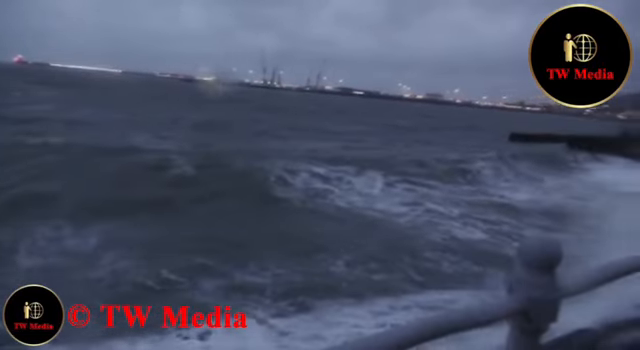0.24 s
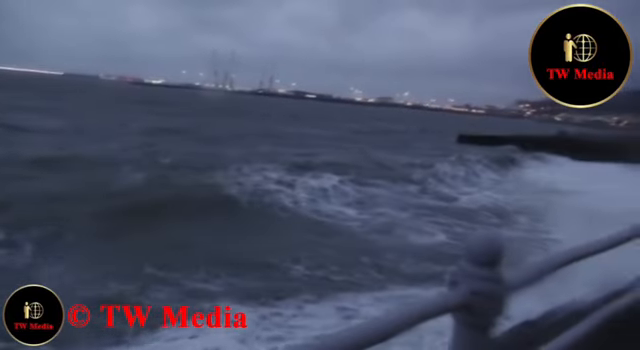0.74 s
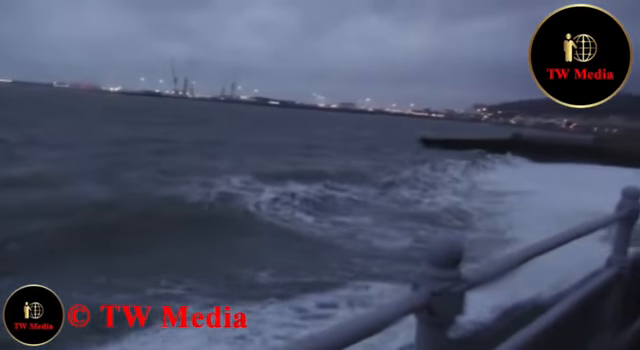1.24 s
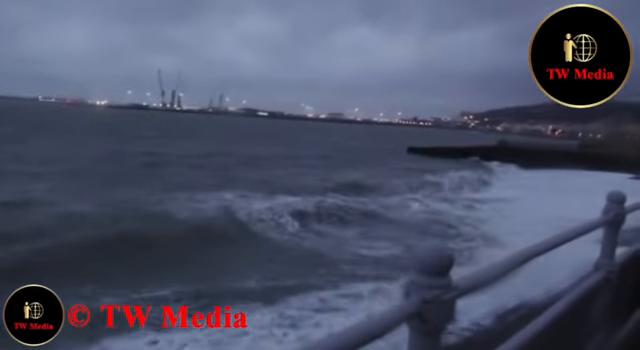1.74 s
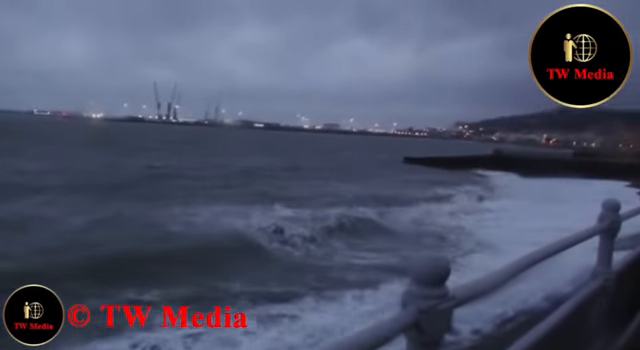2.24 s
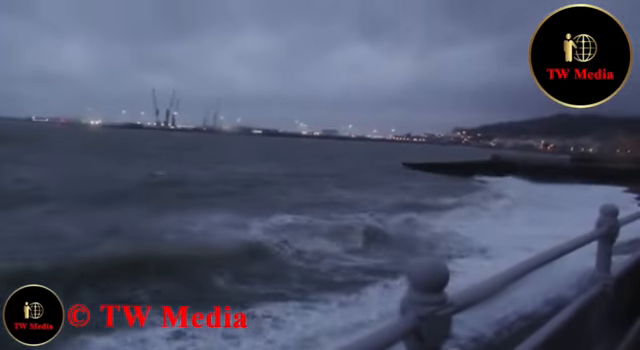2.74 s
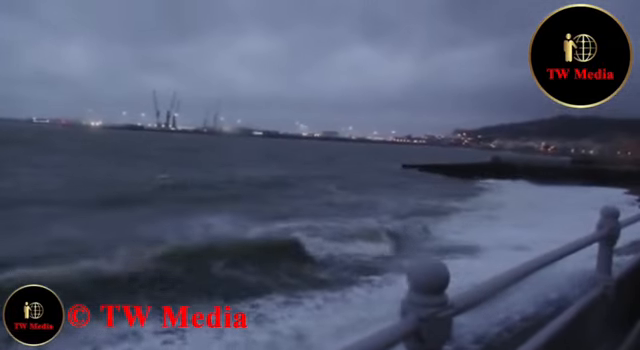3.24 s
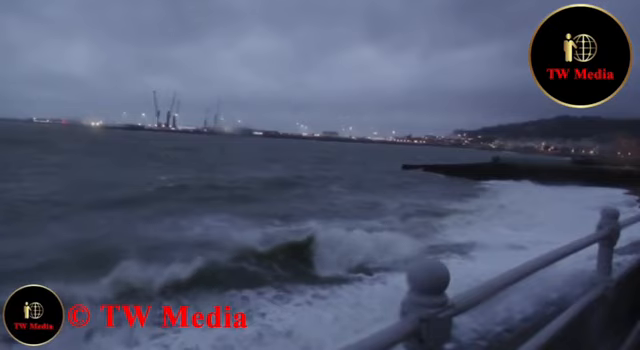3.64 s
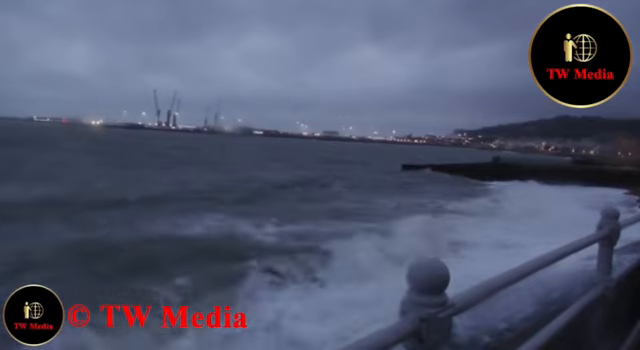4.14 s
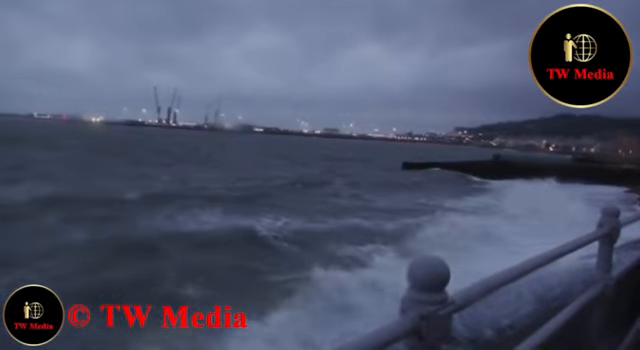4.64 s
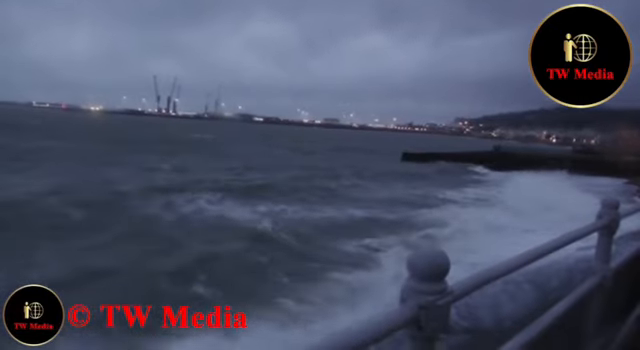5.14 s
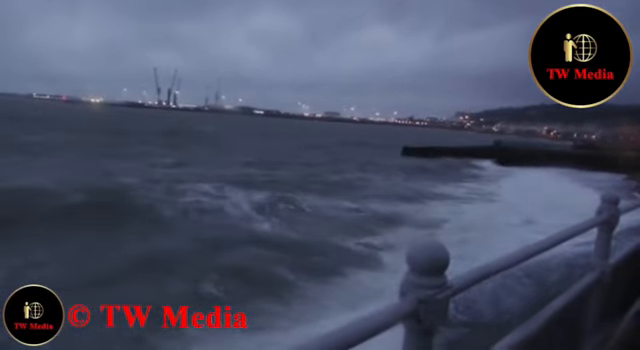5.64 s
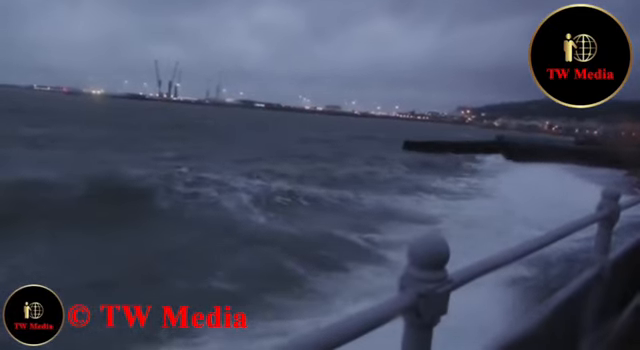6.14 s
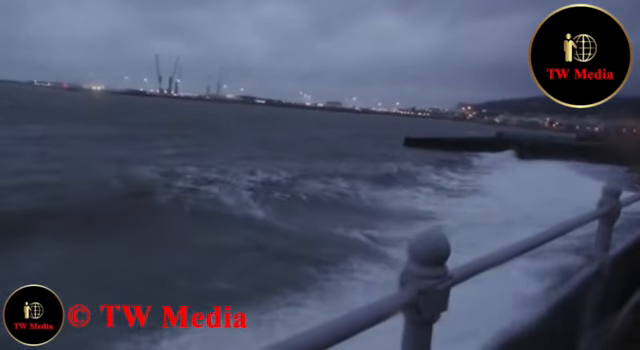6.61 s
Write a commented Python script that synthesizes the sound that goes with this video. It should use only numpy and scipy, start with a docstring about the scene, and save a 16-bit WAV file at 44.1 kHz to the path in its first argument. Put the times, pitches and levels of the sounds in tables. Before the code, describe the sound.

On an exposed seafront in a storm, low wind rumble dominates in stereo, heaving and tearing at the microphone. Rough water washes quietly at first, gradually swelling. Past the middle, a near wave plunges and its foam rushes up the wall, splashing and hissing for under two seconds. The surf then fades while gusty buffeting continues, peaks slightly squashed.

```python
"""A steady low roar: strong wind buffets both ports of a hand-held camera.
A storm sea washes along a harbour seawall; one wave topples close by and its foam sweeps up the wall.
Wind is shaped noise in four eddy sizes; water is patchy noise plus bursting bubbles under surging levels.
The camera's limiter holds the buffets down, so the surf flutters with them."""
import sys
import numpy as np
from scipy import signal
from scipy.fft import rfft, irfft, next_fast_len
from scipy.io import wavfile
from scipy.ndimage import uniform_filter1d, minimum_filter1d, map_coordinates

SR = 44100
rng = np.random.default_rng(int(sys.argv[2]) if len(sys.argv) > 2 else 0)


def master(y):
    """Save y as 16-bit WAV."""
    cut = np.clip(np.atleast_2d(y).T, -1, 1)
    pcm = np.round(cut * 32767)  # scale
    wavfile.write(sys.argv[1], SR, pcm.astype(np.int16))


N = 303011
TOP_HZ = 11700  # band limit


def amp(db):
    """Decibels to gain."""
    return 10 ** (np.asarray(db) / 20)


def unit(x):
    """Scale to rms 1, over all channels together."""
    return x / np.sqrt(np.mean(x ** 2) + 1e-20)


def along(points, hz):
    """Read (Hz, value) points on a log frequency axis."""
    point_hz, value = np.transpose(points)
    return np.interp(np.log(hz + 1), np.log(point_hz + 1), value)


def curves(rows):
    """One value per sample for each column after the time in seconds."""
    s, *columns = np.transpose(rows)
    return [np.interp(np.arange(N) / SR, s, column) for column in columns]


def wobble(knots_per_s):
    """A smooth curve through random knots."""
    knots = rng.standard_normal(int(N * knots_per_s / SR) + 4)
    return map_coordinates(knots, [np.arange(N) * knots_per_s / SR])


def filtered(x, response):
    """Multiply the spectrum of x by a response of frequency."""
    m = next_fast_len(N + SR // 2)
    return irfft(rfft(x, m) * response(np.fft.rfftfreq(m, 1 / SR)), m)[..., :N]


def split(x, edge_hz):
    """The parts below and above an edge, each at rms 1."""
    low = filtered(x, lambda hz: 1 / (1 + (hz / edge_hz) ** 8))
    return unit(low), unit(x - low)


def hump(middle_s, width_s):
    """A bell in time that stays above half its height for width_s."""
    return 0.5 ** ((2 * (np.arange(N) / SR - middle_s) / width_s) ** 2)


def blows(rows):
    """Summed power of bells, each row: middle in seconds, width in seconds, level in dB."""
    return sum(amp(db) ** 2 * hump(s, width_s) for s, width_s, db in rows)


def at_ports(pair, spectrum, alike, side_db):
    """Colour two unrelated signals and blend them into left and right; their mean has rms 1."""
    def turn(hz):
        return np.arccos(np.clip(along(alike, hz), -1, 1)) / 2

    def mid_side(hz):
        return amp(along(spectrum, hz)) * [np.cos(turn(hz)), np.sin(turn(hz))]

    mid, side = filtered(pair, mid_side)
    left_right = np.array([mid + side, mid - side])
    ports = filtered(left_right, lambda hz: amp(np.outer([.5, -.5], along(side_db, hz))))
    return ports / np.std(ports.mean(axis=0))


# Likeness of the wind at the two ports. Each row: frequency in Hz, correlation (-1 to 1).
WIND_CORRELATION = [(25, 1), (60, 0.78), (100, 0.87), (170, 0.48), (230, 0.011), (300, -0.14), (500, 0.059),
                    (1000, -0.053), (3000, -0.074)]
# Side of the wind. Each row: frequency in Hz, left minus right in dB.
WIND_SIDE_DB = [(30, -3), (55, -1.5), (120, 3.5), (210, 0.5), (300, 1), (400, -3), (700, -3.5), (1200, -3),
                (3000, -0.5)]


def eddies(spectrum, steady_s):
    """Turbulence at the ports, its power held even over spans longer than steady_s."""
    x = at_ports(rng.standard_normal((2, N)), spectrum, WIND_CORRELATION, WIND_SIDE_DB)
    power = uniform_filter1d(np.mean(x, axis=0) ** 2, size=max(int(steady_s * SR), 1))
    return x / np.sqrt(np.abs(power) + 1e-6)


# Colour of the slow heave. Each row: frequency in Hz, relative level in dB per Hz.
SWELL_SPECTRUM = [(8, -15), (22, -7), (32, -4), (60, 1), (90, -0.5), (120, -1.5), (170, -15.5), (400, -88)]


def unit_swell():
    """Largest eddies at even power, before they heave."""
    return eddies(SWELL_SPECTRUM, steady_s=0.12)


# Slow heaving of the air at the ports. Each row: time in seconds, level in dB.
HEAVE_DB = [(0, -26), (.4, -21), (.7, -27), (1.22, -19.5), (1.55, -25), (1.85, -19), (2.17, -26.5),
            (2.45, -23), (2.95, -23.5), (3.15, -24), (3.55, -24.5), (3.7, -22), (4.05, -35), (4.3, -21.5),
            (4.52, -22.5), (4.72, -24), (5.0, -24.5), (5.55, -19.5), (5.8, -24), (6.87, -21)]


def heave(swell):
    """The largest eddies rise and fall slowly."""
    return amp(curves(HEAVE_DB)[0] + 1.1 * wobble(9.8)) * swell


# Colour of the thumps. Each row: frequency in Hz, relative level in dB per Hz.
THUMP_SPECTRUM = [(35, -18), (60, -5), (86, 4), (120, -4.5), (160, -10), (400, -81)]
# Big eddies in the bass. Each row: middle in seconds, width in seconds, level in dB.
THUMP_EVENTS = [(.24, 0.16, -19.5), (.83, 0.17, -20.5), (1.07, 0.16, -29), (2.47, 0.1, -19.5),
                (3.19, 0.11, -20), (3.52, 0.24, -22.5), (4.02, 0.14, -18), (5.19, 0.14, -24.5),
                (5.4, 0.17, -22.5), (5.63, 0.073, -23.5), (6.33, 0.15, -21)]


def thumps():
    """Single big eddies thump in the bass."""
    return np.sqrt(blows(THUMP_EVENTS)) * eddies(THUMP_SPECTRUM, steady_s=0.08)


# Turbulence of the air. Each row: time in seconds, level in dB.
TURBULENCE_DB = [(0, 2), (.25, -2), (.6, 1.5), (1.0, -0.3), (1.7, -0.3), (2.2, 1), (2.65, 0.5), (3.2, -1.5),
                 (3.9, -0.6), (4.45, -0.2), (4.8, -2.2), (5.0, -3), (5.25, -3.5), (5.45, -3.5),
                 (5.75, -6.5), (6.1, -2.5), (6.7, -6), (6.87, -8.5)]
# Buffets that tear at the ports. Each row: middle in seconds, width in seconds,
# level in dB against the small eddies.
BUFFET_EVENTS = [(.05, 0.069, -12), (.47, 0.1, 2.5), (.74, 0.2, -4.5), (1.03, 0.052, -7),
                 (1.17, 0.18, -2.5), (1.42, 0.11, -3), (1.61, 0.053, 3), (2.02, 0.053, 2), (2.32, .12, -12),
                 (2.61, 0.13, -1.5), (3.02, 0.038, 1.5), (3.39, 0.034, 2), (3.72, 0.06, -11),
                 (5.24, 0.083, -5.5), (5.66, 0.051, -4.5), (5.85, 0.06, -3), (6.03, 0.12, -1),
                 (6.22, 0.11, -2), (6.4, 0.077, -0.5), (6.59, 0.11, 1), (6.77, 0.047, -0.5),
                 (6.87, 0.037, -1)]


def turbulence():
    """Background turbulence and separate buffets, added as power, in dB."""
    return 10 * np.log10(amp(curves(TURBULENCE_DB)[0]) ** 2 + blows(BUFFET_EVENTS))


# Speed of the air across the ports. Each row: time in seconds, gust share (0 slack, 1 full gust).
GUST_SHARE = [(0, 0.53), (.7, 0.32), (1.25, 0.63), (1.68, 0.16), (2.03, 0.95), (2.27, 0.8), (2.55, 1),
              (2.9, 0.77), (3.35, 0.61), (3.85, 0.86), (4.12, 0.64), (4.27, 0.25), (4.6, 0.94), (4.78, 0.5),
              (4.92, 0.08), (5.1, .45), (5.55, 0.44), (5.75, 0.05), (6.0, 0.59), (6.25, 0.4), (6.6, 0.41),
              (6.87, 0.38)]
# Roar in slack air. Each row: frequency in Hz, relative level in dB per Hz.
SLACK_ROAR_SPECTRUM = [(35, -26), (80, -8), (120, -1), (165, 0), (250, -3), (330, -9.5), (600, -33),
                       (1500, -85)]
# Roar in a full gust. Each row: frequency in Hz, relative level in dB per Hz.
GUST_ROAR_SPECTRUM = [(50, -36.5), (100, -7), (140, -2), (175, 1), (240, -4), (340, -9), (600, -28.5),
                      (1500, -95)]
ROAR_DB, ROAR_GUST_DB = -21.5, 5  # slack air, rise in a full gust
ROAR_FOLLOWS_DB_PER_DB = 0.48  # roar per turbulence


def roar(turbulence_db):
    """Mid-sized eddies roar, louder and higher in faster air."""
    gust = np.clip(curves(GUST_SHARE)[0], 0, 1)
    level_db = ROAR_DB + ROAR_GUST_DB * gust + ROAR_FOLLOWS_DB_PER_DB * turbulence_db + 0.5 * wobble(9.7)
    slack = np.sqrt(1 - gust) * eddies(SLACK_ROAR_SPECTRUM, steady_s=0.1)
    full = np.sqrt(gust) * eddies(GUST_ROAR_SPECTRUM, steady_s=.11)
    return amp(level_db) * (slack + full)


# Colour of the small eddies. Each row: frequency in Hz, relative level in dB per Hz.
FLUTTER_SPECTRUM = [(130, -13.5), (250, -3), (350, 2), (500, -2.17), (700, -7.8), (1000, -15.5),
                    (1500, -22), (2500, -31.5), (4000, -41.5), (6000, -46.5), (11000, -77.5)]
FLUTTER_DB = -24  # at 0 dB turbulence


def flutter(turbulence_db, swell):
    """Small eddies ride on the swell and tear off in quick bursts."""
    level_db = FLUTTER_DB + turbulence_db + 1.1 * wobble(19)
    burst_db = 1.02 * wobble(40) + 0.54 * wobble(140) + 0.57 * swell.mean(axis=0)
    bursts = unit(amp(burst_db))
    return amp(level_db) * bursts * eddies(FLUTTER_SPECTRUM, steady_s=0.07)


def wind():
    """Large eddies heave, thump and roar; small ones flutter on top."""
    swell = unit_swell()
    turbulence_db = turbulence()
    return heave(swell) + thumps() + roar(turbulence_db) + flutter(turbulence_db, swell)


def churn(patchy_db):
    """Two noises of rms 1 with shared patches of random gain in time and frequency."""
    z = signal.stft(rng.standard_normal((2, N)), nperseg=512)[2]
    field = uniform_filter1d(rng.standard_normal(z.shape[1:]), size=8, axis=0)
    field = uniform_filter1d(field, size=10, axis=1)
    noise = signal.istft(z * amp(patchy_db * unit(field)), nperseg=512)[1]
    return unit(noise[:, :N])


def bubbles(count, centre_hz, spread, cycles, size_db):
    """Two streams of bursting bubbles and drops: short damped rings, a few much larger than the rest."""
    when, port = rng.random((2, count))
    hz = centre_hz * np.exp(spread * rng.standard_normal(count))
    hz = np.clip(hz, 400, TOP_HZ)[:, None]
    size = amp(size_db * np.minimum(rng.exponential(size=count), 4))[:, None]
    k = np.arange(160)  # samples in a ring
    phase = hz * k / SR
    rings = size * np.sin(2 * np.pi * phase) * np.exp(-phase / cycles)
    start = (when * (N - len(k))).astype(int) + N * (port > .5)
    streams = np.bincount((start[:, None] + k).ravel(), rings.ravel(), 2 * N)
    return unit(streams.reshape(2, N))


# Foam washing along the wall. Each row: time in seconds, surf level in dB.
WASH_LEVEL_DB = [(0, -52), (1.1, -49), (1.3, -52), (1.62, -46.5), (2.1, -46), (2.7, -44), (3.7, -43),
                 (4.4, -36), (5.3, -42), (5.85, -43.5), (6.02, -44.5), (6.45, -47.5), (6.7, -51.5),
                 (6.87, -49.5)]
# Breaking water. Each row: start in seconds, length in seconds, surf level in dB,
# brightness in dB (weighted by treble).
SURGE_EVENTS = [(-.1, 0.57, -46, 9.5), (0.094, 0.07, -44.5, 12), (0.215, 0.14, -51, 0),
                (0.366, 0.046, -45.5, 3), (1.683, 0.18, -51, -6), (2.287, 0.17, -48, -0.5),
                (2.948, 0.14, -43.5, 1), (3.848, 0.15, -44.5, 0.5), (4.065, 0.5, -39.5, -2.6),
                (4.17, 0.13, -39.5, 10), (4.288, 0.25, -43.5, 0), (4.583, 0.2, -39, 1),
                (4.812, 0.813, -39, -1), (4.965, 0.049, -34, -3.5), (5.03, 0.286, -36, 0),
                (5.143, 0.135, -35, .8), (5.705, 0.105, -41, 2)]
SURGE_RISE_S, SURGE_FALL_S = 0.036, 0.0095  # build-up, time constant of the collapse
LOUD_SURF_DB = -26.5  # surf level of a full break


def surf_level(treble):
    """Wash plus surges that build, hold and collapse, in dB against a full break."""
    t = np.arange(N) / SR
    power = amp(curves(WASH_LEVEL_DB)[0]) ** 2
    for start_s, length_s, db, bright_db in SURGE_EVENTS:
        build = np.clip((t - start_s) / SURGE_RISE_S, 0, 1)
        collapse = np.exp(-np.maximum(t - start_s - length_s, 0) / SURGE_FALL_S)
        power = power + (amp(db + treble * bright_db) * build * collapse) ** 2
    return 10 * np.log10(power) - LOUD_SURF_DB


# Colour of the wash. Each row: frequency in Hz, relative level in dB per Hz.
WASH_SPECTRUM = [(200, -17), (600, 0.5), (1200, -1), (1700, -1), (2700, -3.5), (3600, -3), (5000, -7),
                 (6000, -12.5), (7500, -13.5), (11000, -47)]
# Likeness of the wash at the two ports. Each row: frequency in Hz, correlation (-1 to 1).
WASH_CORRELATION = [(300, 0.11), (1000, 0.52), (1700, 1), (2800, 0.47), (3600, .97), (4900, 0.88),
                    (6200, 0.072), (7200, 0), (9000, 0)]
# Side of all the water. Each row: frequency in Hz, left minus right in dB.
SEA_SIDE_DB = [(500, 2.5), (2000, 0), (2900, 1), (4000, 0), (7000, -0.5), (9200, -3), (11000, -1)]


def wash(near):
    """Foam along the wall: churning noise and bubbles, less of it as the near wave takes over."""
    foam = churn(patchy_db=2.0)
    foam = foam + 0.31 * bubbles(count=10000, centre_hz=3500, spread=0.48, cycles=1.0, size_db=2.2)
    return np.sqrt(1 - near) * at_ports(foam, WASH_SPECTRUM, WASH_CORRELATION, SEA_SIDE_DB)


# Colour of the spray. Each row: frequency in Hz, relative level in dB per Hz.
SPRAY_SPECTRUM = [(3500, -28.5), (5500, -4.5), (6200, -7), (7200, -1), (8800, 8), (10000, 8), (11250, -3),
                  (11700, -29)]
# Likeness of the spray at the two ports. Each row: frequency in Hz, correlation (-1 to 1).
SPRAY_CORRELATION = [(5200, .6), (6300, 0.1), (7200, 0.95), (8200, 0.25), (9500, -0.52), (11000, -0.64)]
SPRAY_DB, SPRAY_GROWS_DB_PER_DB = -10, 1.21  # in a full break, against surf level


def spray():
    """Fine drops ring high and follow the surf."""
    level_db = SPRAY_DB + SPRAY_GROWS_DB_PER_DB * surf_level(treble=0.13)
    drops = churn(patchy_db=3.5)
    drops = drops + 0.44 * bubbles(count=9000, centre_hz=7440, spread=0.28, cycles=1.7, size_db=2.5)
    return amp(level_db) * at_ports(drops, SPRAY_SPECTRUM, SPRAY_CORRELATION, SEA_SIDE_DB)


# Colour of the crash. Each row: frequency in Hz, relative level in dB per Hz.
CRASH_SPECTRUM = [(300, 0), (700, 6.5), (1100, -0.5), (1600, 0.3), (2100, -2), (2800, -4.5), (3600, -1.5),
                  (5200, -6), (6100, -12.5), (7500, -13), (11000, -33.5)]
# Likeness of the near wave at the two ports. Each row: frequency in Hz, correlation (-1 to 1).
CRASH_CORRELATION = [(300, 0.96), (900, 0.98), (1600, 1), (2100, 1), (2700, 0.93), (3100, .85), (3600, 1),
                     (4500, 1), (5000, 1), (5500, 1), (6200, .3), (7200, 1), (9000, 0.2)]


def crash(near):
    """The near wave breaks from one direction: churning noise and longer-ringing bubbles."""
    splash = churn(patchy_db=1.2)
    splash = splash + 0.3 * bubbles(count=9000, centre_hz=3320, spread=0.551, cycles=2.45, size_db=3)
    return np.sqrt(near) * at_ports(splash, CRASH_SPECTRUM, CRASH_CORRELATION, SEA_SIDE_DB)


# Colour of the falling crest. Each row: frequency in Hz, relative level in dB per Hz.
PLUNGE_SPECTRUM = [(90, -26), (200, 3), (350, 9), (550, 5.5), (800, -5), (1200, -10.5), (2000, -29)]
# The crest coming down. Each row: middle in seconds, width in seconds, level in dB against the rush.
PLUNGE_EVENTS = [(4.35, 1, 3.5), (5.22, .35, -1)]


def plunge():
    """The weight of the falling crest: low churning noise."""
    crest = at_ports(churn(patchy_db=2.0), PLUNGE_SPECTRUM, CRASH_CORRELATION, SEA_SIDE_DB)
    return np.sqrt(blows(PLUNGE_EVENTS)) * crest


# The wave that breaks close by. Each row: time in seconds, its share of surf power (0 to 1).
BREAKER_SHARE = [(0, 0), (1.3, 0.38), (2.5, 0.2), (3.5, 0.9), (3.95, 0.76), (4.25, 0.9), (4.6, 0.65),
                 (5.3, 1), (5.7, 0.97), (6.2, 0.18), (6.87, 0)]
RUSH_DB, RUSH_GROWS_DB_PER_DB = 4.5, 0.9  # in a full break, against surf level
HISS_DB = 1.25  # against surf level


def sea():
    """Foam washes along the wall; the near wave crashes and plunges, with spray above."""
    near = np.clip(curves(BREAKER_SHARE)[0], 0, 1)
    rush_db = RUSH_DB + RUSH_GROWS_DB_PER_DB * surf_level(treble=-0.98) + 0.53 * wobble(12)
    hiss_db = HISS_DB + surf_level(treble=0)
    # large air pockets rush, fine foam hisses
    rush, hiss = split(wash(near) + crash(near), edge_hz=2840)
    body = amp(rush_db) * (rush + plunge())
    slosh = amp((1.05 - 0.47 * near) * wobble(26))  # water falls in uneven sheets
    return amp(LOUD_SURF_DB) * slosh * (body + amp(hiss_db) * hiss + spray())


def scene():
    """Wind at the camera over the sea below."""
    return wind() + sea()


def limiter(x, ceiling_db, hold_s):
    """Both channels are turned down together around every peak above the ceiling."""
    needed = np.minimum(1, amp(ceiling_db) / (np.abs(x).max(axis=0) + 1e-9))
    span = max(int(hold_s * SR), 2)
    return x * uniform_filter1d(minimum_filter1d(needed, size=span), size=span)


def record(dry):
    """The camera limits the buffets and keeps nothing above its band limit."""
    held = limiter(dry * amp(-1.22), ceiling_db=-5.5, hold_s=0.024)
    return filtered(held, lambda hz: hz < TOP_HZ)


dry = scene()
out = record(dry)
master(out)
```